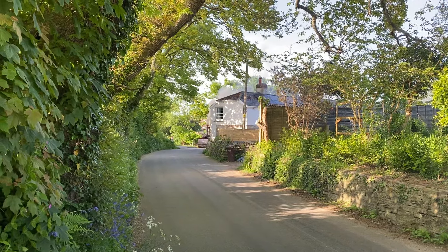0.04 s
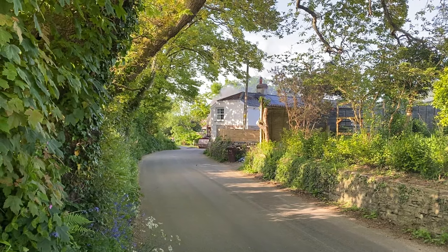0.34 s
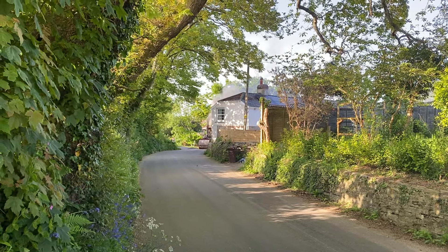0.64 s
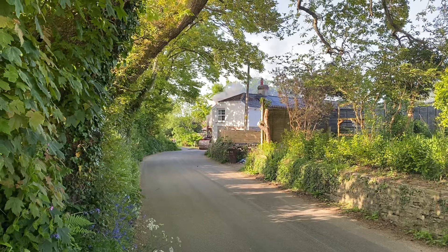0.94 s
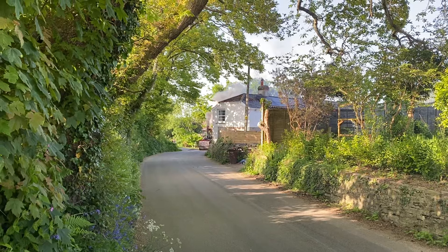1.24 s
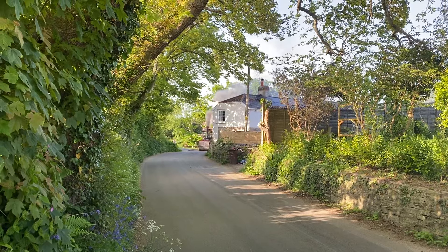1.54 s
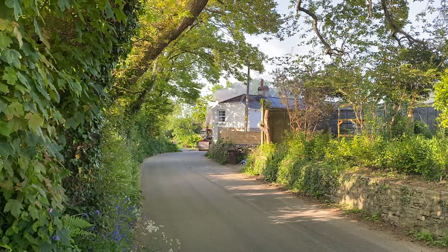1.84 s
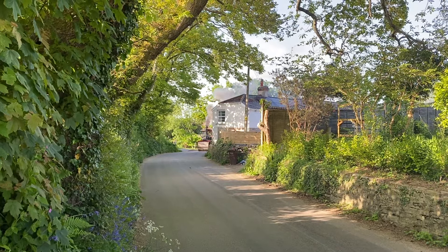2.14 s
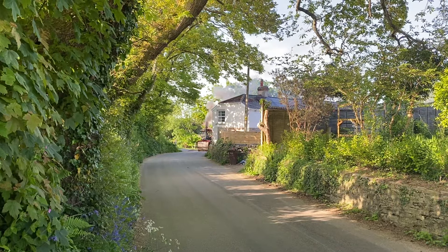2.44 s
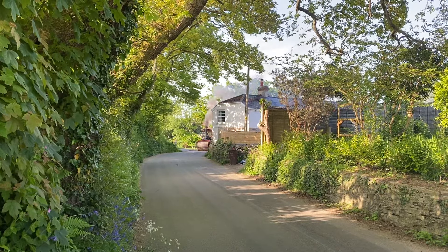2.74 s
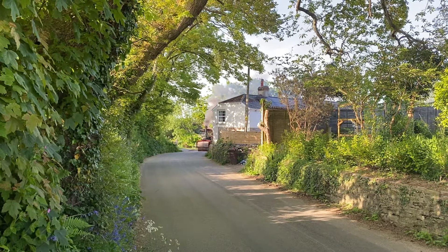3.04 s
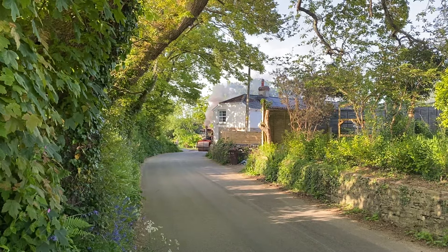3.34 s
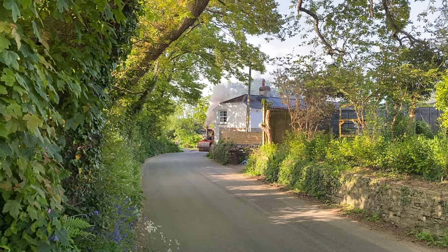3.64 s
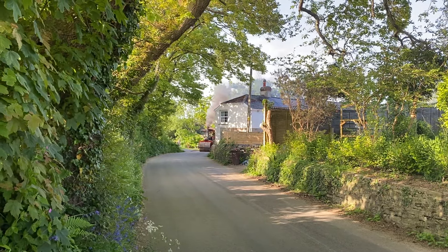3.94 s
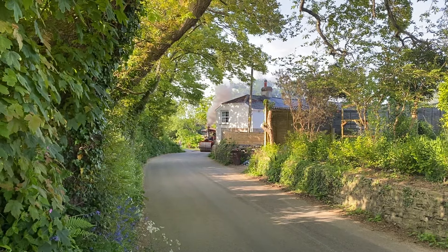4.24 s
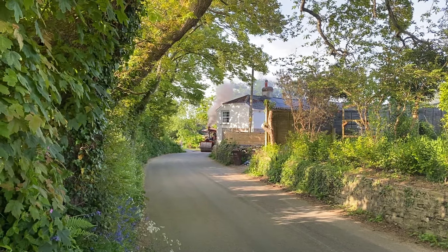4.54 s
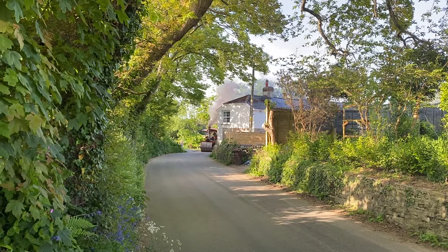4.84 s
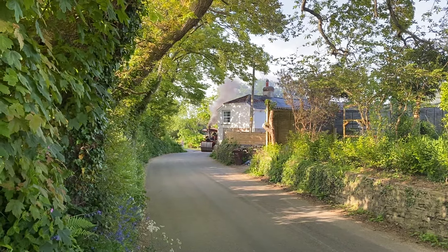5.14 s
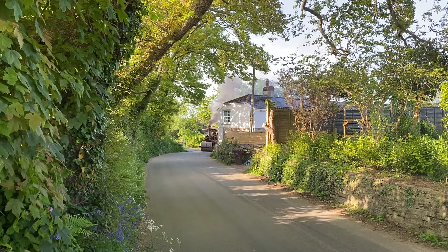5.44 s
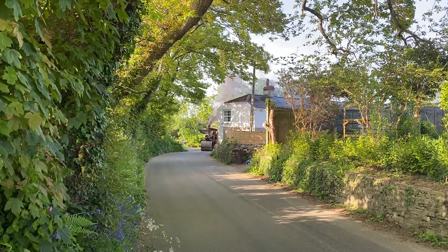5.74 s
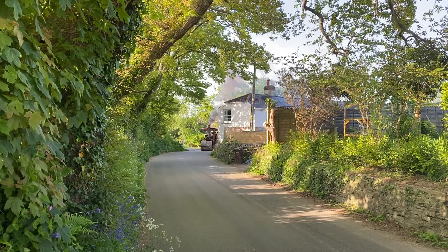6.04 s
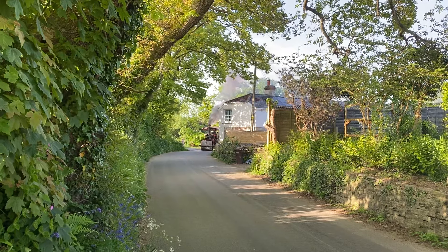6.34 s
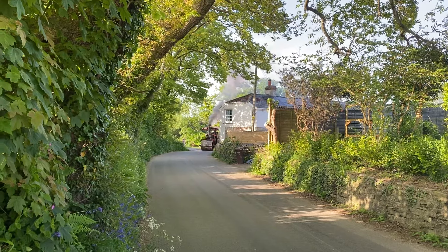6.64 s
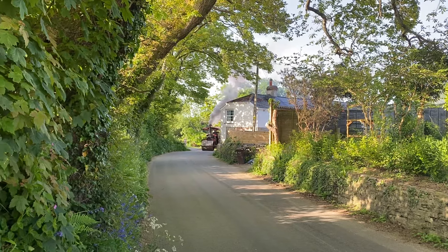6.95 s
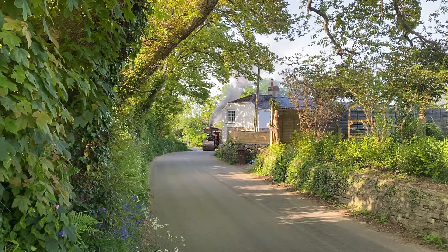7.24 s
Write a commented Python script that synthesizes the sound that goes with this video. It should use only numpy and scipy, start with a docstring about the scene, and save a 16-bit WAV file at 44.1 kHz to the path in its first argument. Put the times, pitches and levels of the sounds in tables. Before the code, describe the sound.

A steam roller chuffs from the start, a little under four beats a second, weak and strong in turn. Each puff has a hollow chimney bark and a deep boom underneath. At first the engine is fairly soft, hidden behind a house, with short echoes from walls and trees. A dull knock comes at about 0.3 seconds, and a far bird gives a few faint, gliding whistles between 0.6 and 2 seconds. From about 3.5 seconds the iron rolls rumble more noticeably and knock irregularly on the road. A thin steam hiss rises at around 4.5 seconds. The chuffs swell from 5 seconds, are loudest and brightest around 6 seconds, and quicken to about four and a half a second. The sharpest knocks fall near 6.5 seconds. The chuffing eases slightly but continues to the end, just past 7 seconds. A soft outdoor hiss lies underneath throughout.

```python
"""A country lane: a steam roller chuffs closer, speeding up as it comes round a house.
Each exhaust beat, weak and strong in turn, blows steam up the chimney and sets the smokebox booming.
Underneath, the fire draws, the glands leak and the iron rolls rumble and knock on the road.
Walls, hedges and trees throw back short echoes; a far bird whistles over a soft outdoor hiss."""
import sys
import numpy as np
from scipy import signal
from scipy.fft import rfft, irfft
from scipy.io import wavfile
from scipy.ndimage import uniform_filter1d

SR = 44100
rng = np.random.default_rng(int(sys.argv[2]) if len(sys.argv) > 2 else 0)


def master(y):
    """Save y as 16-bit WAV."""
    cut = np.clip(np.atleast_2d(y).T, -1, 1)
    pcm = np.round(cut * 32767)  # scale
    wavfile.write(sys.argv[1], SR, pcm.astype(np.int16))


N = 325458
TIME, HZ = np.arange(N) / SR, np.fft.rfftfreq(N, 1 / SR)
SHOT = 16384  # samples in a one-shot: a puff, a knock or a short echo
SHOT_TIME, SHOT_HZ = np.arange(SHOT) / SR, np.fft.rfftfreq(SHOT, 1 / SR)


def gain_of(db):
    """Decibels to amplitude."""
    return 10 ** (np.asarray(db) / 20)


def unit_rms(x):
    """Scales to rms 1."""
    return x / np.sqrt(np.mean(x ** 2) + 1e-20)


def read(points, hz):
    """Reads an EQ curve on a log-frequency axis."""
    f, value = np.transpose(points)
    return np.interp(np.log(hz + 1), np.log(f + 1), value)


def follow(curve, s):
    """Reads an automation curve at time s."""
    return np.interp(s, *np.transpose(curve))


def bell(hz, centre_hz, width_hz):
    """A resonant peak of height 1."""
    return 1 / (1 + (2 * (hz - centre_hz) / width_hz) ** 2)


def add(mix, s, sound):
    """Mixes a sound in at time s."""
    part = mix[max(round(s * SR), 0):][:len(sound)]
    part += sound[:len(part)]


def causal(db):
    """A minimum-phase EQ: it rings only after it is struck."""
    log_gain = np.log(gain_of(np.maximum(db, db.max() - 100)))
    mirrored = np.concatenate([log_gain, log_gain[-2:0:-1]])
    return np.exp(np.conj(signal.hilbert(mirrored)))[:len(db)]


def noise(colour):
    """Steady noise of a given colour, rms 1."""
    return unit_rms(irfft(rfft(rng.standard_normal(N)) * gain_of(read(colour, HZ)), N))


def drift(rate):
    """A smooth random wander, rms 1, changing about rate times a second."""
    return unit_rms(irfft(rfft(rng.standard_normal(N)) * np.exp(-(HZ / rate) ** 2), N))


def swell(peak_s, sharpness):
    """A one-shot envelope that rises to 1 at peak_s and dies away."""
    u = SHOT_TIME / max(peak_s, .002)
    return (u * np.exp(1 - u)) ** sharpness


def burst(envelope, colour_db, db, span_s):
    """A shaped burst of noise through a body; db is its level over span_s."""
    sound = irfft(rfft(envelope * rng.standard_normal(SHOT)) * causal(colour_db))
    return gain_of(db) * unit_rms(sound) * np.sqrt(span_s * SR / SHOT)


def scatter(shape, per_s):
    """Sparse random reflection taps."""
    return rng.standard_normal(shape) * (rng.random(shape) < per_s / SR)


# The outdoor bed. Each row: frequency in Hz, relative level in dB.
AIR_COLOUR = [(20, -15), (32, -26), (46, 26), (65, 20), (110, 9.5), (250, 4), (600, -3), (950, -9.5),
              (1700, -1), (4000, -4.5), (7000, 0), (10000, -11), (13000, -5.5), (15500, -24)]

def air(level_db=-45, side_db=-55):
    """Open air: a steady hiss and low drone, nearly the same left and right."""
    mid = gain_of(level_db) * noise(AIR_COLOUR)
    side = gain_of(side_db) * noise([(50, 64), (300, 57.5), (1500, 57), (6000, 56), (15000, -62)])
    return np.array([mid + side, mid - side])


# The chimney's resonances. Each row: frequency in Hz, width in Hz, lift in dB.
CHIMNEY_MODES = [(151.9, 14.2, 17), (294.5, 25.6, 11.5), (458, 28, 5), (552, 34, 6), (630.3, 31, 11),
                 (916, 23, 6), (1096, 69, 10.5), (1180, 65, -0.5), (1285, 81, 10.5), (1427, 52, 11),
                 (1610, 58, 4), (1820, 81, 7), (2896, 340, 8.5), (3110, 320, 11.5)]

def chimney(hz, pitch=1):
    """The lift in dB that the chimney's air column gives at each frequency."""
    lift = sum((gain_of(db) - 1) * bell(hz, f * pitch, width) for f, width, db in CHIMNEY_MODES)
    return 20 * np.log10(np.maximum(1 + lift, .1))


# The breath up the chimney between beats. Each row: frequency in Hz, relative level in dB.
DRAUGHT_COLOUR = [(60, -32), (150, -8.5), (300, -29), (470, -4.5), (640, -10), (800, -14), (1250, -24),
                  (1600, -8.5), (2300, -71), (3000, -44), (4000, -6.5), (14000, -64)]

def draught(level_db=-54.5):
    """The fire's draught keeps the chimney faintly sounding."""
    breath = irfft(rfft(noise(DRAUGHT_COLOUR)) * gain_of(chimney(HZ)), N)
    return gain_of(level_db) * unit_rms(breath)


# The thin hiss of the glands. Each row: frequency in Hz, relative level in dB.
LEAK_COLOUR = [(500, -30), (2300, -24), (3200, -2), (5000, -5), (7500, -2), (10000, -12.5), (15000, -23)]
# How near the machine feels; rides the leak and the jolts. Each row: time in seconds, nearness in dB.
NEARNESS = [(0, -14), (1.5, -12), (3.2, -39), (4.7, 1.5), (5.5, 0), (7.38, 1)]
# One spurt: start in seconds, level in dB, centre in Hz, width in Hz, attack in seconds.
STEAM_SPURT = (2.513, -52, 4700, 2600, .02)

def leak(level_db=-53.5, nearness_share=0.55, waver_db=1):
    """Steam escapes from the glands: a wavering hiss, louder when near, and one short spurt."""
    hiss = noise(LEAK_COLOUR)
    hiss *= gain_of(level_db + nearness_share * follow(NEARNESS, TIME) + waver_db * drift(rate=12))
    s, db, centre_hz, width_hz, peak_s = STEAM_SPURT
    colour_db = 20 * np.log10(bell(SHOT_HZ, centre_hz, width_hz))
    add(hiss, s, burst(swell(peak_s, sharpness=3.1), colour_db, db, span_s=0.097))
    return hiss


# The tone of the rolls and gearing. Each row: frequency in Hz, relative level in dB.
IRON_COLOUR = [(60, -1.5), (150, -7), (250, -5), (470, 2), (620, -1), (780, -9.5), (1300, -11), (2300, -21),
               (3100, -32), (4200, -32), (8000, -44), (15000, -65)]
# The rumble's fader, up on rough patches of road. Each row: time in seconds, level in dB.
RUMBLE_LEVEL = [(0, -70.5), (3.2, -57.5), (4.1, -50.5), (4.4, -50.5), (4.9, -52), (5.35, -49),
                (5.65, -43.5), (5.85, -50), (6.15, -48), (6.55, -45), (6.8, -52), (7.38, -52)]

def rumble(lumpy_db=3):
    """Iron rolls grind over the road with a lumpy rumble."""
    return noise(IRON_COLOUR) * gain_of(follow(RUMBLE_LEVEL, TIME) + lumpy_db * drift(rate=16.5))


# The chuffs. Each row: start in seconds, blast in dB, extra drum in dB, extra hoot in dB, bark in Hz.
BEATS = [(0.2012,-13.5,0,-3,583), (0.4729,-13.5,1.5,1,607), (0.7524,-12,-3.5,1,585),
         (1.025,-11.5,0.5,0,550), (1.305,-14.5,0.5,4,617), (1.5685,-11.5,-2.5,0.5,615),
         (1.8427,-12.5,0.5,1.5,620), (2.1003,-13.5,-0.5,1.5,565), (2.374,-12.5,-1.5,1.5,610),
         (2.637,-11.5,-0.5,1.5,570), (2.911,-11,0.5,-2,637), (3.1788,-9,-1.5,-3,555),
         (3.4593,-9.5,-1.5,0,630), (3.7326,-8.5,-6,1.5,625), (4.0144,-8.5,4,-5,520),
         (4.289,-9.5,2.5,-4,580), (4.5754,-10,0.5,0,592), (4.856,-7.5,-1.5,-1,600), (5.144,-6.5,-0.5,3,614),
         (5.4255,-3.5,1.5,3,607), (5.699,0,-2,0.5,585), (5.9517,1.5,1.5,0,576), (6.200,0.5,-0.5,-2.5,568),
         (6.4337,-0.5,0,0.5,627), (6.662,-1,-1.5,-2,490), (6.8829,-4,1,0,569), (7.0998,-4.5,0.5,-1,567),
         (7.305,-5,1,1.5,580)]

def strokes():
    """The valve opens twice a turn of the crank: pairs of (1 if weak or 0 if strong, beat)."""
    return [(1 - k % 2, beat) for k, beat in enumerate(BEATS)]


# The raw jet of the blast pipe. Each row: frequency in Hz, relative level in dB.
JET_COLOUR = [(90, -21), (230, -21), (360, -12), (460, -5.5), (640, -6), (790, -16), (930, -13), (1150, -9),
              (1750, -15.5), (2250, -19), (2700, -14), (3150, -14.5), (3900, -15.5), (7000, -19),
              (14000, -45)]
# How far the house hides the chimney. Each row: time in seconds, share from 0 to 1.
HIDDEN = [(0, 0.88), (2.7, 0.66), (4.7, 0.3), (5.5, 0)]
# The EQ of a chuff heard round the house. Each row: frequency in Hz, gain in dB.
HOUSE_SHADOW = [(290, 1.5), (360, -4.5), (540, -1), (690, 1.5), (790, 0), (860, 4), (980, -9.5),
                (1150, -2.5), (1450, -1), (1750, 0)]
# A chuff's bands, low to high: drum, hoot, roar, rasp, hiss. Each row: base level in dB, dB per dB
# of blast, weak-stroke trim in dB, base attack in seconds, sharpness, stretch per dB of blast.
CHUFF_BANDS = [(-37, 0.33, -3.5, 0.02, 1.4, 0.02), (-28.5, 0.45, -4, 0.021, 3.6, 0),
               (-28.1, 1.1, -3, 0.022, 3.1, 0), (-33.5, 0.7, -3, 0.021, 2.36, .004),
               (-36.5, 0.55, -2.5, 0.024, 2.6, 0.02)]

def exhaust(flutter=0.033, heat=0.0084, uneven_db=2.5, bark_db=2.5, weak_lag_s=0.00053):
    """Each release of steam chuffs through the chimney, with a hollow bark from its throat."""
    hz = SHOT_HZ + 1
    lowpasses = [1 / (1 + (hz / split_hz) ** 12) for split_hz in (370, 800, 2300, 4000)]
    shares = np.diff([np.zeros_like(hz), *lowpasses, np.ones_like(hz)], axis=0)
    crossovers_db = 10 * np.log10(abs(shares) + 1e-12)
    out = np.zeros(N)
    for weak, (s, blast_db, drum_db, hoot_db, bark_hz) in strokes():
        # hotter or cooler gas shifts the resonances, and no two jets have quite the same colour
        pitch = 1 + heat * rng.standard_normal()
        ripple = uniform_filter1d(rng.standard_normal(len(hz)), size=70)
        ripple = unit_rms(uniform_filter1d(ripple, size=50))
        hidden = follow(HIDDEN, s)
        bark = bark_db * (1 + hidden) * bell(hz, bark_hz, width_hz=84)
        colour_db = read(JET_COLOUR, hz) + chimney(hz, pitch) + bark + uneven_db * ripple
        colour_db += hidden * read(HOUSE_SHADOW, hz)
        # the air column throttles the roar, rasp and hiss at about its lowest mode
        throb_hz = CHIMNEY_MODES[0][0] * rng.uniform(0.88, 1.32)
        throb = 1 + flutter * np.sin(2 * np.pi * (throb_hz * SHOT_TIME + rng.random()))
        throttles, extras_db = (1, 1, throb, throb, throb), (drum_db, hoot_db, 0, 0, 0)
        for band, crossover_db, throttle, extra_db in zip(CHUFF_BANDS, crossovers_db, throttles, extras_db):
            db, slope, weak_db, peak_s, sharpness, stretch = band
            attack_s = peak_s * np.exp(stretch * blast_db) + weak * weak_lag_s
            level_db = db + slope * blast_db + weak * weak_db + extra_db
            envelope = swell(attack_s, sharpness) * throttle
            puff = burst(envelope, colour_db + crossover_db, level_db, span_s=0.071)
            add(out, s - .007, puff)  # the valve slides open, so the blast creeps in early
    return out


# The smokebox's deep modes. Each row: frequency in Hz, relative level in dB, 60 dB decay in seconds.
SMOKEBOX_MODES = [(46.4, 1.5, 0.91), (62.1, 5.5, 0.35), (80.1, 1, 0.42)]
# The boom's fader for strong strokes. Each row: time in seconds, level in dB.
BOOM_LEVEL = [(0, -42.5), (1.2, -39.5), (2.4, -40.5), (3.2, -39), (4.9, -37), (5.6, -33.5), (6.5, -33),
              (7.3, -34)]

def boom(weak_db=-2.5, lag_s=0.0041, rise_s=0.04, span_s=0.12):
    """The slug of gas leaving the chimney sets the smokebox ringing; its modes beat as they die."""
    t, out = np.arange(2 * SHOT) / SR, np.zeros(N)
    for weak, (s, *_) in strokes():
        detune = 1 + 0.019 * rng.standard_normal(len(SMOKEBOX_MODES))
        ring = sum((-1) ** k * gain_of(db - 60 * t / t60) * np.sin(2 * np.pi * hz * detune[k] * t)
                   for k, (hz, db, t60) in enumerate(SMOKEBOX_MODES))
        ring *= (1 - np.exp(-t / rise_s)) ** 1.15
        level_db = follow(BOOM_LEVEL, s) + weak * weak_db
        add(out, s + lag_s, gain_of(level_db) * unit_rms(ring) * np.sqrt(span_s / t[-1]))
    return out


def reflect(x, taps, colour):
    """Plays x through a cluster of reflections with an EQ curve."""
    response = irfft(rfft(taps / np.linalg.norm(taps)) * causal(read(colour, SHOT_HZ)))
    return signal.fftconvolve(x, response)[:N]


def verges(x, level_db=-17, t60_s=0.079):
    """Early reflections off the near wall and hedge widen the image."""
    taps = scatter(SHOT, per_s=2000) * gain_of(-60 * SHOT_TIME / t60_s)
    side = reflect(x, taps, [(100, -14), (500, -9), (1500, -2), (3500, 4), (9000, -93)])
    return gain_of(level_db) * np.array([side, -side])


def lane_reverb(x, predelay_s=.018, width=0.12):
    """Scattered echoes from walls, hedges and trees; the treble dies first."""
    colour = [(60, -3), (150, 0), (500, -6.5), (1200, -5), (2200, 5.5), (3150, 3), (4000, 7.5),
              (6000, 6.5), (12000, -13.5)]
    t60_s = [(150, 0.43), (600, 0.85), (1500, 0.67), (3000, 0.45), (8000, 0.36)]
    taps = scatter((2, SR), per_s=2500) * (np.arange(SR) > predelay_s * SR)
    hz, t, frames = signal.stft(taps, SR, nperseg=256)
    fade_db = -60 * t / read(t60_s, hz)[:, None] + read(colour, hz)[:, None]
    tail = signal.istft(frames * gain_of(fade_db), SR, nperseg=256)[1]
    mid, side = signal.fftconvolve(x[None], tail / np.linalg.norm(tail[0]), axes=1)[:, :N]
    return np.array([mid + width * side, mid - width * side])


def jolts(count=40, per_s=3, level_db=-49, spread_db=3, tilt_db=-3.5, attack_s=.005):
    """Cues for small random bumps, louder when the machine is near, laid out like HARD_KNOCKS."""
    gap, strength = rng.random((count, 2)).T
    times = np.cumsum(2 * gap) / per_s
    levels = level_db + follow(NEARNESS, times) + spread_db * (2 * strength - 1)
    return [(s, db, tilt_db, attack_s) for s, db in zip(times, levels)]


# The big bumps. Each row: start in seconds, level in dB, tilt in dB per octave, attack in seconds.
HARD_KNOCKS = [(0.274, -37.5, -5.5, 0.004), (0.283, -38, -14, 0.0046), (1.757, -41.5, -20, 0.0052),
               (3.562, -47, -2, 0.0086), (3.792, -37.5, 0.5, 0.0091), (4.03, -45, -9, 0.023),
               (4.052, -34, 0.5, 0.014), (4.098, -38.5, -1.5, 0.011), (4.335, -39.5, 0.5, 0.0058),
               (4.510, -40.5, -3, .008), (5.066, -39.5, -3.5, 0.012), (5.13, -40, -2, 0.0089),
               (5.205, -37, -0.5, .009), (5.6, -37, -8, 0.018), (5.665, -34, -0.5, 0.019),
               (5.738, -35, -2, 0.012), (6.088, -40.5, -6.5, 0.0075), (6.171, -34.5, -2, 0.0067),
               (6.372, -45, 1.5, .008), (6.511, -32.5, 2.5, 0.0064), (6.524, -34, 7, 0.0053),
               (6.571, -39, 0, 0.0046), (6.641, -36.5, -2.5, 0.011)]

def knocks(pivot_hz=500):
    """The rolls and gearing knock at each bump in the road, some dull, some bright."""
    out = np.zeros(N)
    octaves = np.log2(np.clip(SHOT_HZ, 150, 3200) / pivot_hz)
    for s, db, tilt_db, attack_s in list(HARD_KNOCKS) + jolts():
        colour_db = read(IRON_COLOUR, SHOT_HZ) + tilt_db * octaves
        add(out, s, burst(swell(attack_s, sharpness=0.59), colour_db, db, span_s=0.023))
    return out


def far_echo(x, delay_s=0.13, smear_s=.022, level_db=-19):
    """While the house hides the engine, trees across the bend return each beat as a soft second puff."""
    taps = scatter(SHOT, per_s=2000) * np.exp(-SHOT_TIME / smear_s)
    colour = [(150, -9), (600, 0), (1300, -11), (3100, 0), (5000, -12)]
    out = np.zeros(N)
    add(out, delay_s, reflect(x * follow(HIDDEN, TIME), taps, colour))
    return gain_of(level_db) * out


# Bird calls. Each row: start and length in seconds, first and last pitch in Hz, level in dB.
BIRD_WHISTLES = [(0.634, 0.33, 2050, 1730, -65), (1.08, 0.32, 1780, 1820, -67),
                 (1.401, 0.31, 2060, 2590, -60), (1.63, 0.13, 2010, 2320, -66),
                 (1.87, 0.19, 2370, 2640, -61)]

def bird(waver=0.0405):
    """A far bird's thin, gliding whistles."""
    out, wobble = np.zeros(N), 1 + waver * drift(rate=79)
    for s, length_s, start_hz, end_hz, db in BIRD_WHISTLES:
        hz = np.linspace(start_hz, end_hz, int(length_s * SR))
        hz *= wobble[int(s * SR):][:len(hz)]
        whistle = np.sin(2 * np.pi * np.cumsum(hz) / SR) * np.hanning(len(hz))
        add(out, s, gain_of(db) * unit_rms(whistle))
    return out


def scene(send_db=-14, hidden_boost_db=2):
    """The mix: the engine, its echoes (wetter while it is hidden), the bird and the air."""
    steam = exhaust() + draught() + leak()
    iron = rumble() + knocks()
    send = steam * gain_of(send_db + hidden_boost_db * follow(HIDDEN, TIME))
    echoes = lane_reverb(send) + far_echo(steam) + verges(steam + iron)
    return steam + boom() + iron + echoes + bird() + air()


# The microphone housing's resonances. Each row: frequency in Hz, width in Hz, gain in dB.
HOUSING_MODES = [(593, 30, -1.5), (1365, 227, -6.5), (1510, 64, 2.5), (2130, 110, 4.5), (2350, 750, -5.5),
                 (3210, 120, 2), (3900, 2400, -2.5), (4284, 530, -7.5), (4370, 84, 8), (4800, 210, 0),
                 (5370, 390, 0), (5700, 170, -0.5), (5400, 120, -3), (6610, 2420, -5.5)]
# The pan between its two ports. Each row: frequency in Hz, left minus right in dB.
PORT_BALANCE = [(80, 0), (200, -1.2), (520, -2.6), (1250, -1), (1780, -2.5), (2100, -1.5), (2720, 6),
                (3450, -1.3), (4250, 0.5), (5300, 2.5), (5900, 0)]
# The phase between them. Each row: frequency in Hz, left's lead in radians.
PORT_PHASE = [(20, 0), (500, 0), (900, .45), (1550, .35), (1900, 1.2), (3200, .2), (4900, 1), (6400, 0),
              (7500, -.1), (8400, -2.9), (9550, -3.3), (10400, -6.1), (11600, -6.3), (12500, -9.1),
              (13800, -9.6), (14500, -12.4)]

def record(dry, low_cut_hz=32, high_cut_hz=15720):
    """The microphone's housing colours the sound and its two ports differ; then low and high cuts."""
    housing = causal(sum(db * bell(HZ, f, width) for f, width, db in HOUSING_MODES))
    left = gain_of(read(PORT_BALANCE, HZ) / 2) * np.exp(.5j * read(PORT_PHASE, HZ))
    ports = irfft(rfft(dry) * housing * np.array([left, 1 / left]), N)
    low_cut = signal.butter(4, low_cut_hz, "high", fs=SR, output="sos")
    high_cut = signal.firwin(511, high_cut_hz, window=("kaiser", 9), fs=SR)
    return signal.oaconvolve(signal.sosfilt(low_cut, ports), high_cut[None], "same")


dry = scene()
out = record(dry)
master(out)
```